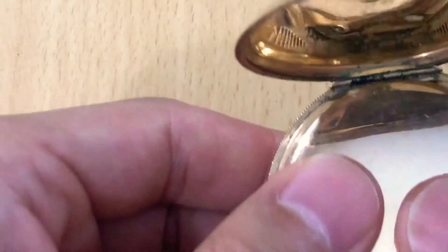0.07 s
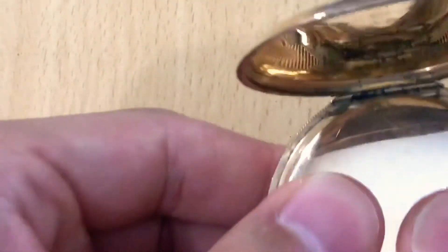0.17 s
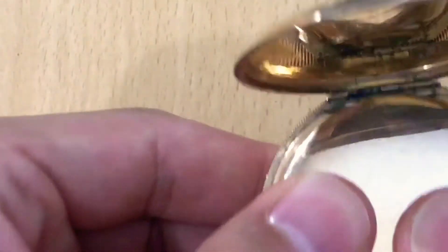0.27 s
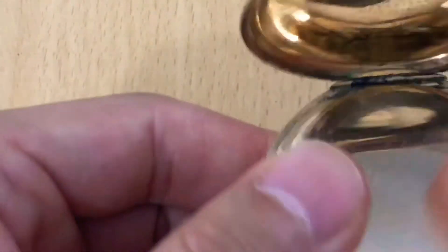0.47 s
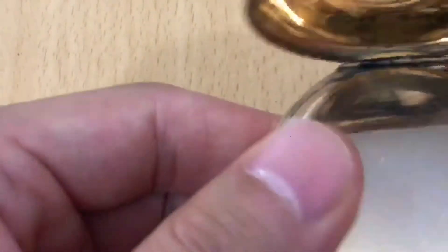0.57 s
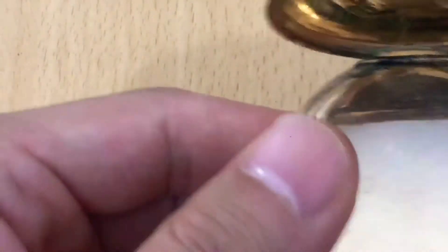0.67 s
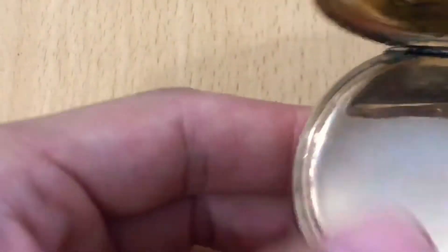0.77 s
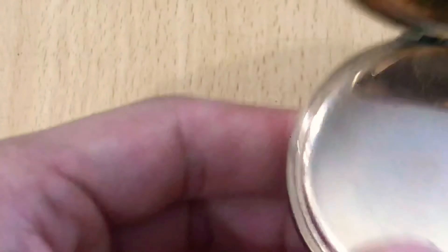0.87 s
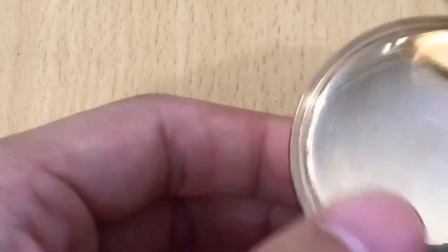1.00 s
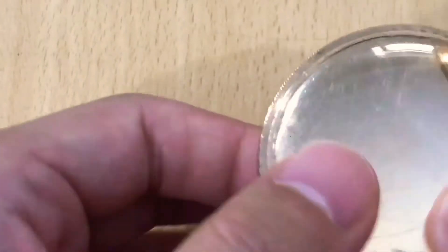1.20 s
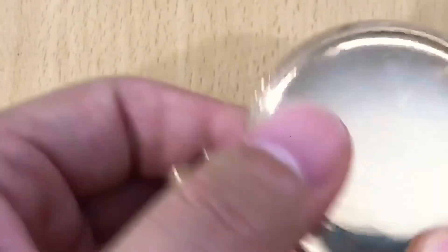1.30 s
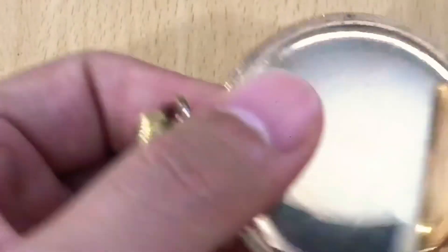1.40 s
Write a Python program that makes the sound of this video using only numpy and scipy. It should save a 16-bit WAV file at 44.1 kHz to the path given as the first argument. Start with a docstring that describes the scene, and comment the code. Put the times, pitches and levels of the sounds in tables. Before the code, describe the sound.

A pocket watch's metal lid snaps early with a bright, sharp double click and brief room echo; soft hiss lingers, then small handling clicks and faint quick ticking follow, close to the microphone in a quiet room.

```python
"""A metal pocket watch handled close by in a small, quiet room.
The catch scrapes and slips, then the lid snaps with a sharp double click: brief forces crack and ring
the case modes, and a decaying noise tail answers as the room. A soft shaped-noise hiss lingers, then stops.
The turned case gives faint clicks of short modes. The movement ticks once early and then, after a gap,
about every fifth of a second: paired impacts of high modes and fizz. Room tone and hum lie beneath."""
import sys
import numpy as np
from scipy import signal
from scipy.fft import rfft, irfft
from scipy.io import wavfile

SR = 44100
rng = np.random.default_rng(int(sys.argv[2]) if len(sys.argv) > 2 else 0)


def wrap_up_sound(samples):
    """Save the sound to the file named by the first command line argument, as 16-bit audio."""
    columns = np.atleast_2d(samples).T
    # keep every value between -1 and 1, then stretch to whole-number steps
    tamed = np.clip(columns, -1, 1)
    steps = np.round(tamed * 32767).astype(np.int16)
    wavfile.write(sys.argv[1], SR, steps)


N = 63945  # length in samples
SNAP_S = .22948  # the lid snaps, and the lingering hiss begins to rise


def amp(db):
    """Decibels to gain."""
    return 10 ** (np.asarray(db) / 20)


def read(points, hz):
    """Interpolates a table of (frequency, value) on a log-frequency axis."""
    f, value = np.transpose(points)
    return np.interp(np.log(hz + 1), np.log(f + 1), value)


def add(mix, s, sound):
    """Adds a sound into the mix at time s, in seconds."""
    part = mix[max(round(s * SR), 0):][:len(sound)]
    part += sound[:len(part)]


def seconds(size):
    """Time axis in seconds."""
    return np.arange(size) / SR


def noise(points):
    """Gaussian noise filtered to the given spectrum, at rms 1."""
    gain = amp(read(points, np.fft.rfftfreq(N, 1 / SR)))
    x = irfft(rfft(rng.standard_normal(N)) * gain, N)
    return x / x.std()


def impulse(points, size=4096):
    """A click with the given spectrum and minimum phase, so its energy comes first."""
    log_gain = np.log(amp(read(points, abs(np.fft.fftfreq(size, 1 / SR)))))
    spectrum = np.exp(np.conj(signal.hilbert(log_gain)))
    return np.fft.ifft(spectrum).real[:size // 2]


def soften(x, hz):
    """A softer contact loses its treble: a one-pole low-pass."""
    r = np.exp(-2 * np.pi * hz / SR)
    return signal.lfilter([1 - r], [1, -r], x)


def ring(hz, db, t60, rise=0, size=6000):
    """One mode: a sine that swells with time constant rise and dies away by 60 dB in t60."""
    t = seconds(size)
    swell = 1 - np.exp(-t / (rise + 1e-9))
    return amp(db - 60 * t / t60) * np.sin(2 * np.pi * hz * t) * swell


def background():
    """Room tone with a faint hum, and a hiss that comes up after the snap and stops short."""
    # room tone spectrum: frequency_hz, relative_level_db
    floor = [(15, -34), (25, -8.5), (75, 6.5), (144, -5), (253, -0.5), (537, -14.5), (666, -11), (782, -17),
             (945, -11.5), (2230, -22), (4380, -23.5), (4750, -26), (5140, -23.5), (8580, -29),
             (15500, -33.5)]
    # steady hum partials: pitch_hz, rms_level_db
    hum_partials = [(55, -85.5), (253, -79)]
    # lingering hiss spectrum: frequency_hz, relative_level_db
    hiss = [(100, 0), (1000, 0.5), (2000, -2), (4000, -3.5), (6500, -7), (7500, -9.5), (9000, -6.5),
            (10500, -13), (11500, -9.5), (13000, -11), (15500, -13.5)]
    floor_db, hiss_db = -63, -62.5
    hiss_rise_s, hiss_end_s, hiss_fall_s = .054, .638, .0069
    t = seconds(N)
    hum = np.zeros(N)
    for hz, db in hum_partials:
        hum += amp(db) * np.sqrt(2) * np.sin(2 * np.pi * (hz * t + rng.random()))
    fade_in = np.clip((t - SNAP_S) / hiss_rise_s, 0, 1)
    fade_out = np.clip((hiss_end_s - t) / hiss_fall_s, 0, 1)
    lingering = amp(hiss_db) * fade_in * fade_out * noise(hiss)
    return amp(floor_db) * noise(floor) + hum + lingering


def ticking():
    """The escapement beats; each impact is a tiny fizz and a high ring."""
    # ticks: start_s, relative_level_db
    ticks = [(.0594, -61), (0.6596, -58), (0.8592, -58), (1.0613, -59), (1.2655, -62.5)]
    # impacts of the escapement within one tick: delay_s, relative_level_db
    escapement = [(0, -4), (.0032, 4)]
    # modes of the movement: pitch_hz, relative_level_db, t60_s, rise_s
    tick_modes = [(4712, 6.5, 0.0083, 0.0027), (4830, -1, 0.037, 0.0041)]
    # fizz spectrum: frequency_hz, relative_level_db
    fizz_colour = [(500, -20), (4000, -6.5), (6500, -7), (8200, -4), (10000, -0.5), (11500, -25),
                   (14000, -2), (16000, -15)]
    fizz_db, fizz_t60_s = -7.5, .015
    out, t = np.zeros(N), seconds(N)
    tick = sum(ring(*mode) for mode in tick_modes)
    fizz_decay = amp(fizz_db - 60 * t / fizz_t60_s)
    for s, level_db in ticks:
        for delay, db in escapement:
            level = amp(level_db + db)
            add(out, s + delay, level * tick)
            add(out, s + delay, level * fizz_decay * noise(fizz_colour))
    return out


def spread(x):
    """Two all-pass filters: the lid passes one band on about half a millisecond late."""
    band_hz, width_hz = 5500, 2900
    r = np.exp(-np.pi * width_hz / SR)
    a = [1, -2 * r * np.cos(2 * np.pi * band_hz / SR), r * r]
    return signal.lfilter(a[::-1], a, signal.lfilter(a[::-1], a, x))


def catch_scrape():
    """The catch scrapes before it lets go: band noise that swells just before the snap."""
    start_s, level_db, hz = .217, -56.5, 5400
    surge, surge_s = 8, .0015  # added gain at the snap, and the time constant of the swell
    t = seconds(N)
    scrape = noise([(hz / 10, -3), (hz / 2, -9), (hz, 0), (hz * 2, -18)])
    swell = 1 + surge * np.exp(-abs(t - SNAP_S) / surge_s)
    return scrape * amp(level_db) * (t > start_s) * (t < SNAP_S) * swell


def lid():
    """Catch contacts, snap and rebound crack and ring the case; gives (direct, sent to room)."""
    # light contacts of the catch before the snap: start_s, relative_level_db, brightness_hz
    contacts = [(.2062, -39, 12000), (.2082, -49, 5000), (.2181, -47, 16000)]
    # modes of the case: pitch_hz, relative_level_db, t60_s
    case = [(954, -25.5, 0.0097), (1273, -22, 0.0299), (2011, -30, 0.0302), (2569, -17.5, 0.0294),
            (2858, -20.5, 0.033), (3339, -24.5, 0.022), (3760, -23, 0.0185), (4155, -23, 0.0307),
            (5384, -26, 0.03), (6160, -26, 0.02), (6980, -22.5, 0.018), (7569, -29.5, 0.0214),
            (9081, -28, 0.0225), (10138, -32.5, 0.0496), (12235, -28, 0.0072)]
    # sharp crack of each contact: frequency_hz, relative_level_db
    crack = [(30, -10), (100, 1), (250, 15.5), (500, -9.5), (1000, 14.5), (3000, 13), (6000, 15),
             (7600, 12), (8700, 1), (10800, -3.5), (12600, 3), (14500, -5), (16500, -9)]
    snap = (SNAP_S, 4, 12037)  # start_s, relative_level_db, brightness_hz
    rebound = (SNAP_S + .00204, -8.5, 2100)
    ring_room_db = -26  # ringing sent to the room
    modes = sum(ring(*mode) for mode in case)
    force = np.zeros(N)
    for s, db, hz in contacts + [snap, rebound]:
        add(force, s, amp(db) * soften(signal.unit_impulse(len(modes)), hz))
    force = spread(force)
    ringing = signal.fftconvolve(force, modes)[:N]
    knock = ring(92, -54, .1)  # low thud as the hand takes the blow
    add(knock, 0, -impulse(crack))
    direct = ringing + signal.fftconvolve(force, knock)[:N] + catch_scrape()
    return direct, force + amp(ring_room_db) * ringing


def room(x):
    """Quick scatter from the hand and table, plus a diffuse noise tail that decays by frequency."""
    # tail spectrum: frequency_hz, relative_level_db
    colour = [(50, -27), (120, -7), (250, -7), (450, -8.5), (600, 3.5), (750, -3.5), (1050, 4.5),
              (1400, 5.5), (1800, -2.5), (2700, 2), (3300, 1), (4200, 1.5), (5000, 0), (6000, -0.5),
              (8000, -7), (9000, -14), (12000, -16.5), (15500, -14)]
    # tail decay: frequency_hz, t60_s
    decay = [(100, 0.36), (500, 0.2), (1200, .27), (3000, 0.26), (6000, 0.17), (10000, 0.25), (16000, 0.19)]
    delay_s, build_s = .003, .011  # the tail waits, then fades in
    near_db, near_t60_s, near_delay_s = -4.5, .018, .0015
    t = seconds(size=24000)
    hz, at, z = signal.stft(rng.standard_normal(len(t)), SR, nperseg=256)
    z = z * amp(-60 * at / read(decay, hz)[:, None])
    tail = signal.istft(z, SR, nperseg=256)[1][:len(t)]
    tail *= np.clip((t - delay_s) / build_s, 0, 1)
    tail = signal.fftconvolve(tail / np.linalg.norm(tail), impulse(colour))[:len(t)]
    near = rng.standard_normal(len(t)) * (t > near_delay_s) * amp(-60 * t / near_t60_s)
    response = tail + amp(near_db) * near / np.linalg.norm(near)
    return signal.fftconvolve(x, response)[:N]


def handling():
    """Faint clicks as the case is turned in the fingers: a dry onset and short modes."""
    # clicks: start_s, relative_level_db, brightness_hz
    clicks = [(0.5916, -43.5, 4500), (.6145, -47, 2200), (1.0752, -59, 4000), (1.101, -62.5, 3000),
              (1.198, -46, 9040), (1.274, -60.5, 2500), (1.3502, -53.5, 3000)]
    # modes of each click: pitch_hz, relative_level_db, t60_s, rise_s
    click_modes = [(1380, -6.5, 0.011, 0.00022), (1970, -1, 0.0091, 0.00034), (2300, 3, 0.0062, 0.00053),
                   (2710, 5, 0.021, 0.0018), (4150, -10, .012, 0.00039), (6700, -8.5, 0.0079, .0003)]
    edge_db = -2  # dry onset, before softening
    out = np.zeros(N)
    # neighbouring modes start in opposite polarity
    click = sum((-1) ** k * ring(*mode) for k, mode in enumerate(click_modes))
    click[0] += amp(edge_db)
    for s, db, hz in clicks:
        add(out, s, amp(db) * soften(click, hz))
    return out


def scene():
    """The watch, too small to radiate deep bass, its room sound and the background."""
    low_cut_hz, small_room_db = 140, -19  # the second sends clicks and ticks to the room
    snap, send = lid()
    small = handling() + ticking()
    watch = snap + small + room(send + amp(small_room_db) * small)
    low_cut = signal.butter(2, low_cut_hz, "high", fs=SR, output="sos")
    return (signal.sosfilt(low_cut, watch) + background())[None]


def record(dry):
    """Clips at full scale, then low-passes to limit the band."""
    edge_hz = 15900
    band_limit = signal.firwin(255, edge_hz, window=("kaiser", 9), fs=SR)
    return signal.oaconvolve(np.clip(dry, -1, 1), band_limit[None], "same")


dry = scene()
out = record(dry)
wrap_up_sound(out)
```